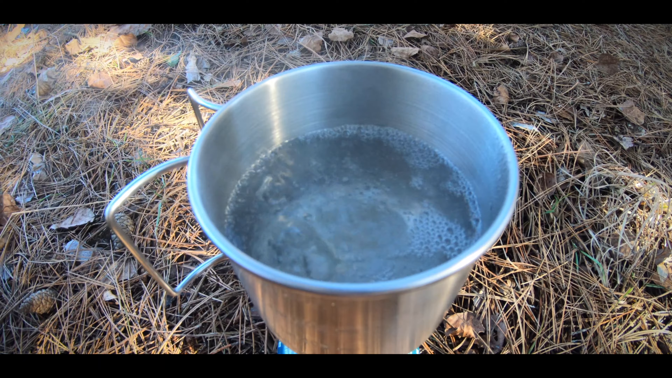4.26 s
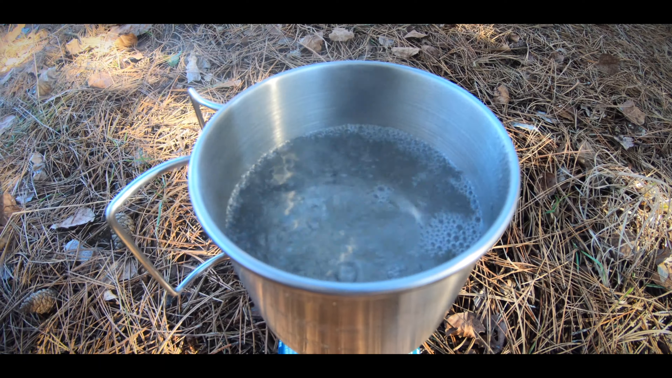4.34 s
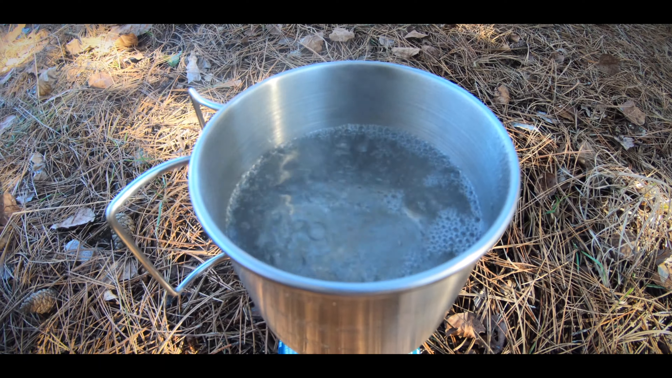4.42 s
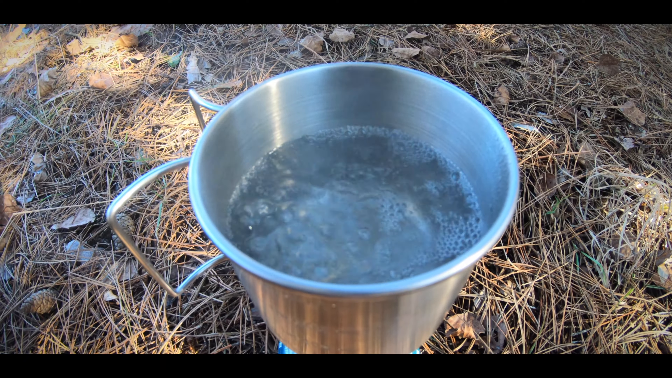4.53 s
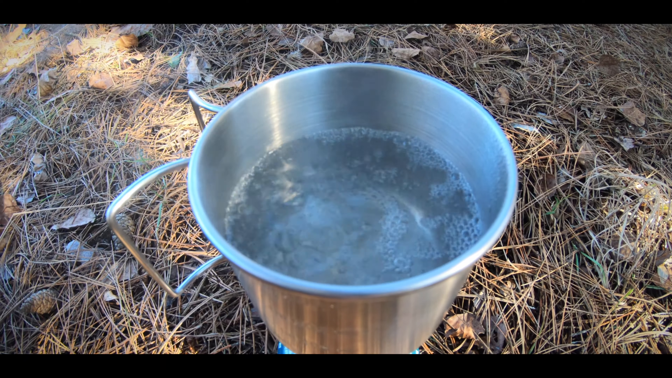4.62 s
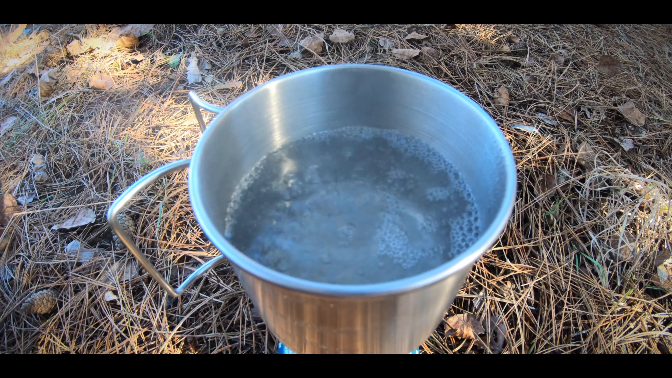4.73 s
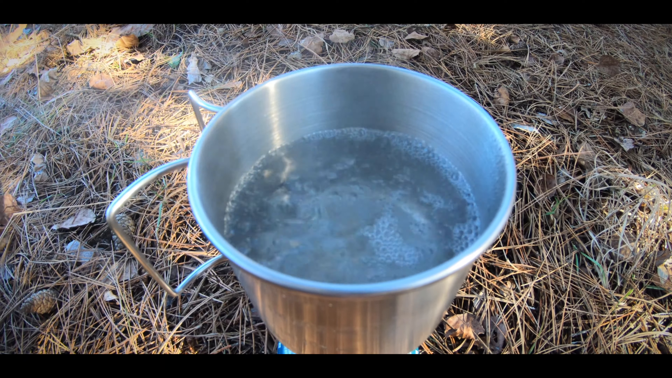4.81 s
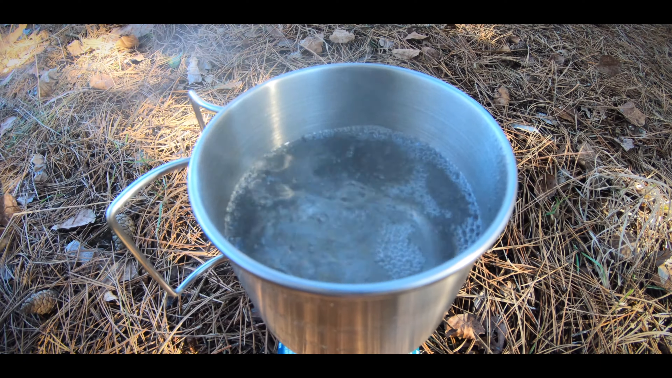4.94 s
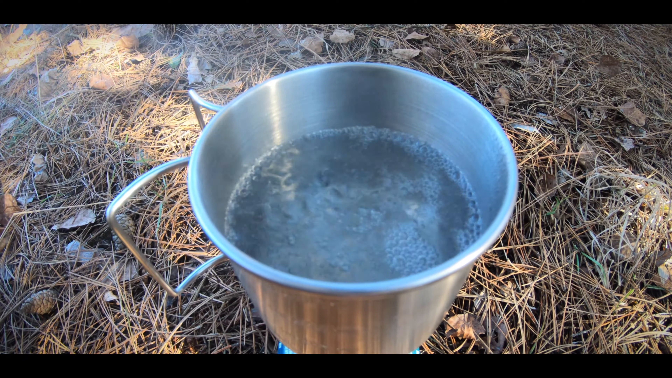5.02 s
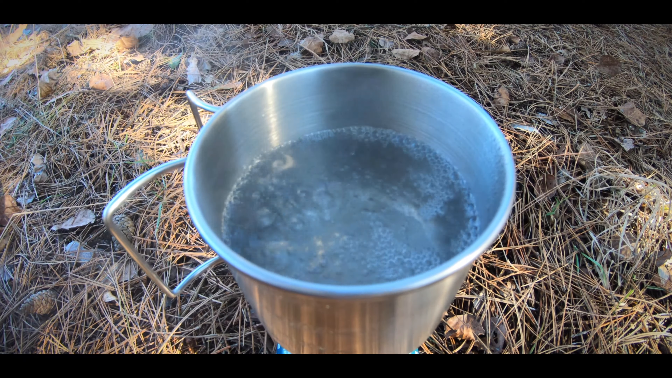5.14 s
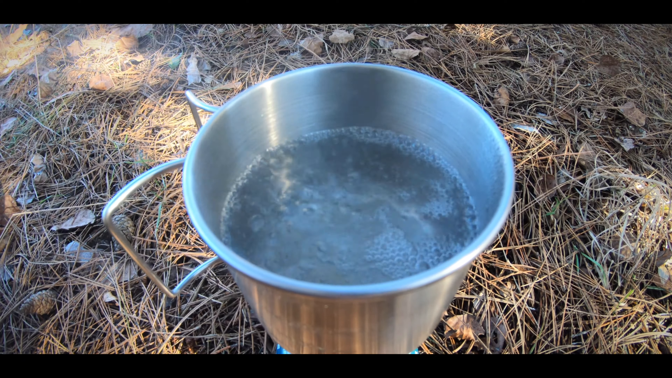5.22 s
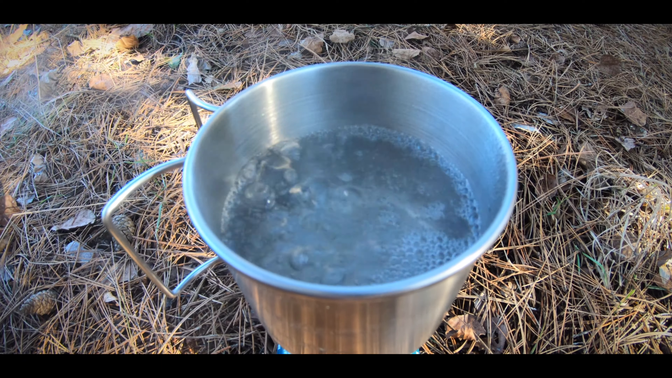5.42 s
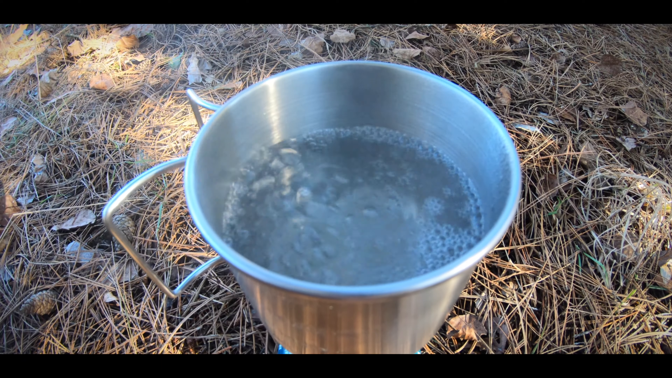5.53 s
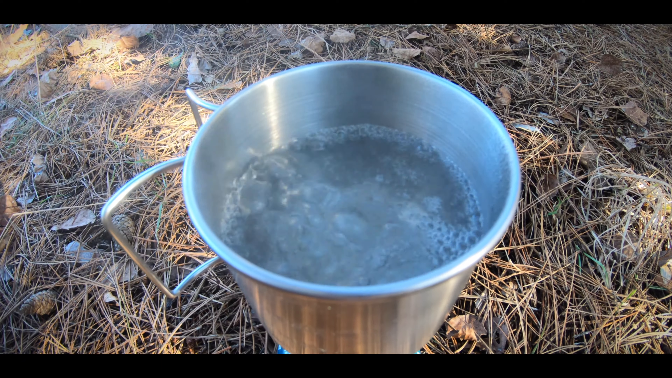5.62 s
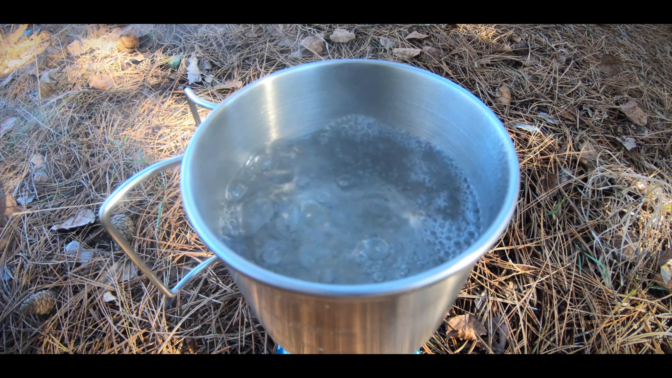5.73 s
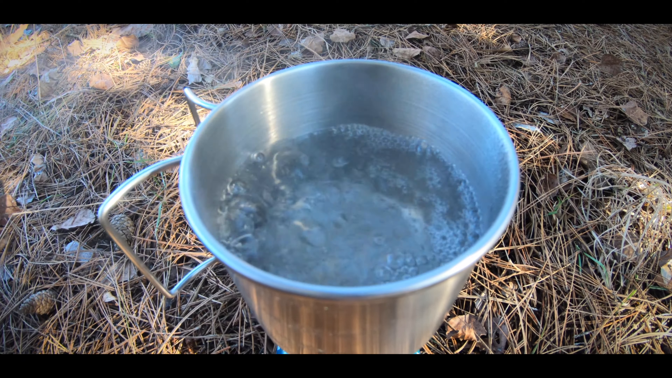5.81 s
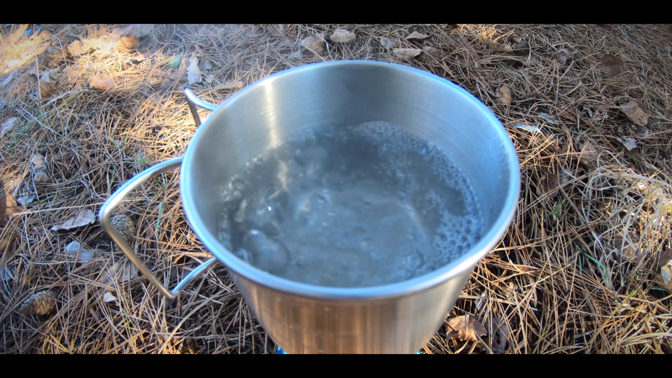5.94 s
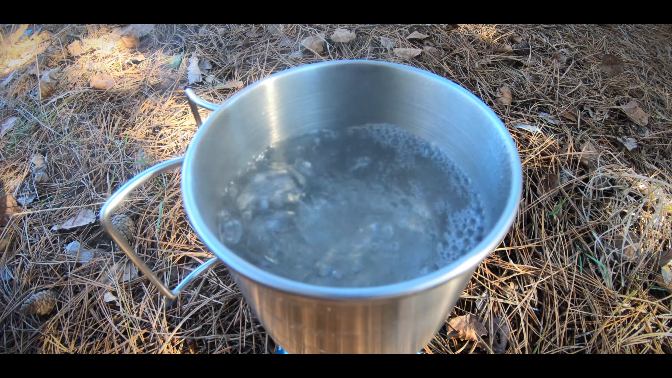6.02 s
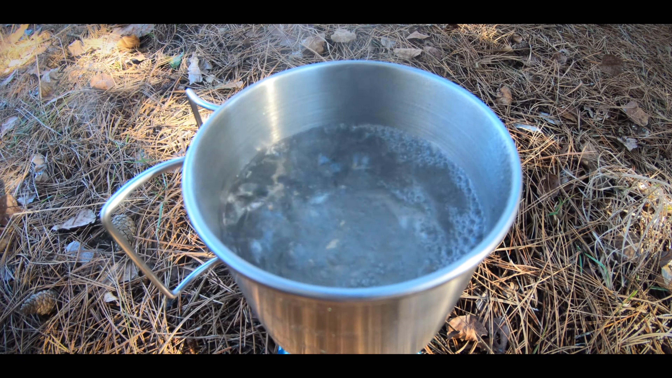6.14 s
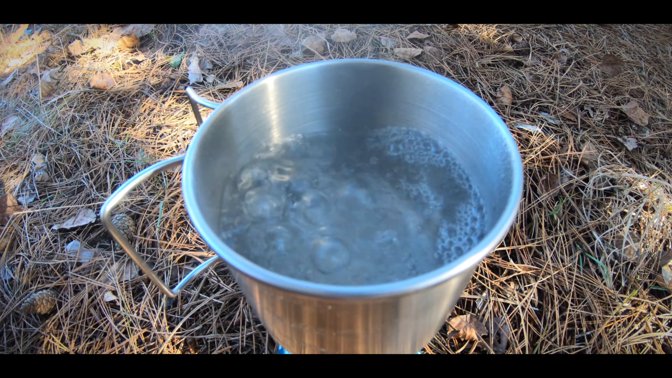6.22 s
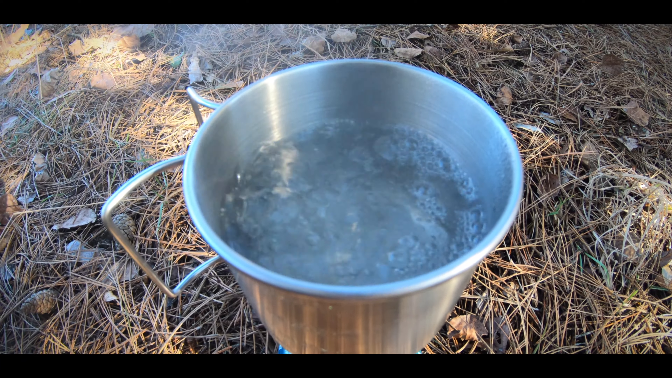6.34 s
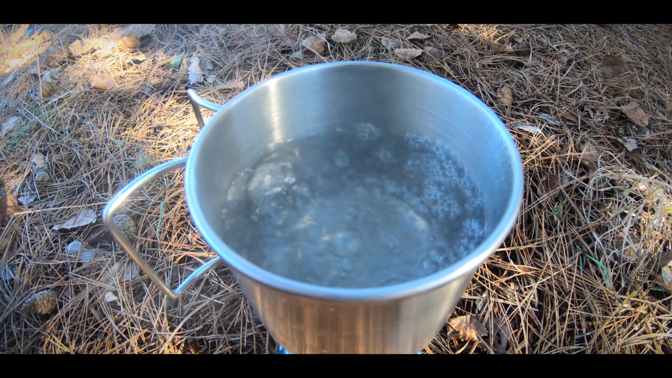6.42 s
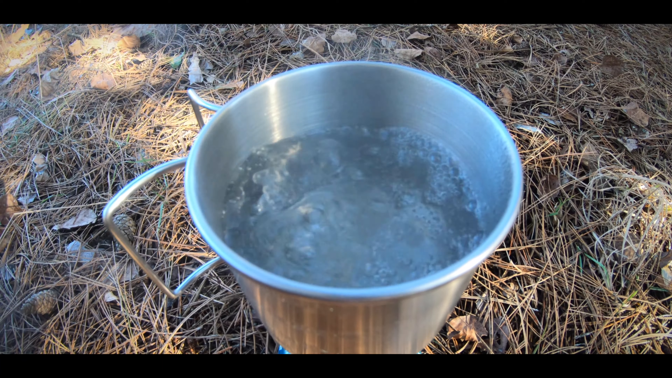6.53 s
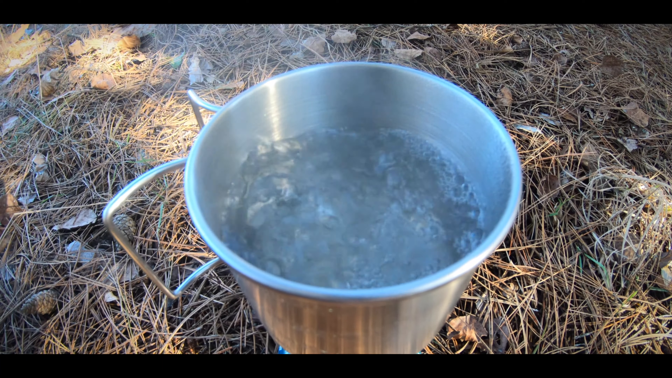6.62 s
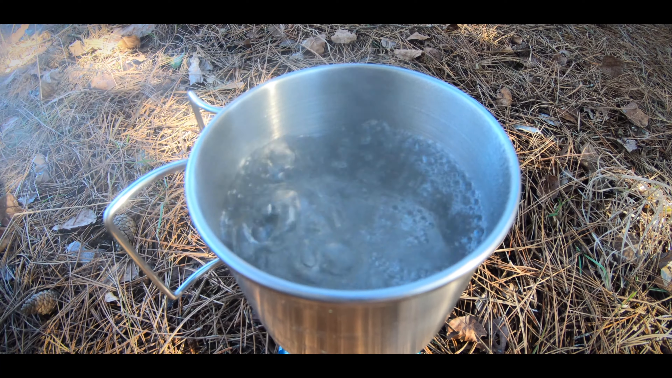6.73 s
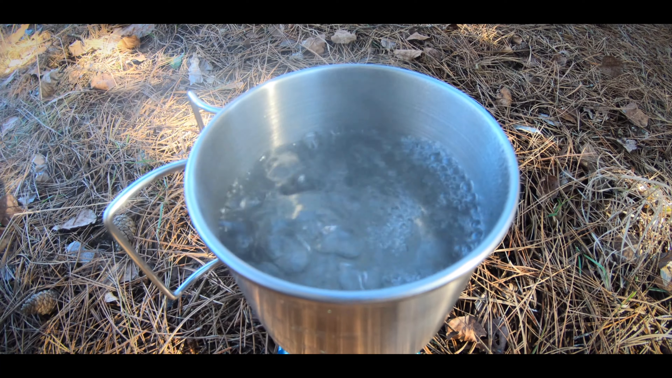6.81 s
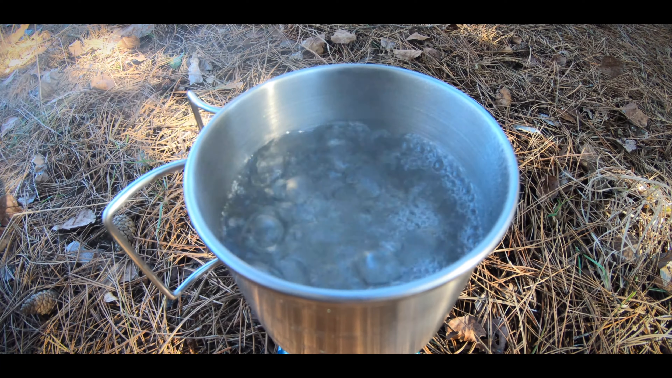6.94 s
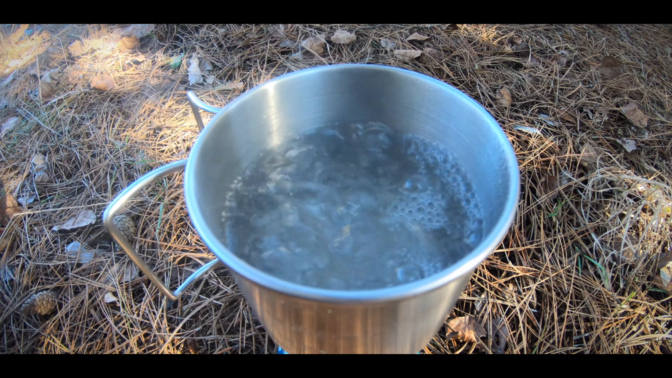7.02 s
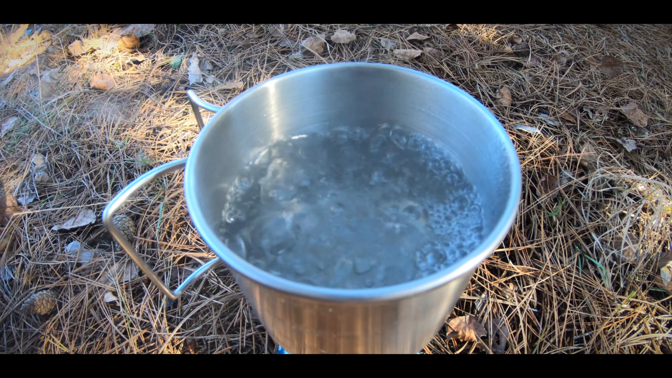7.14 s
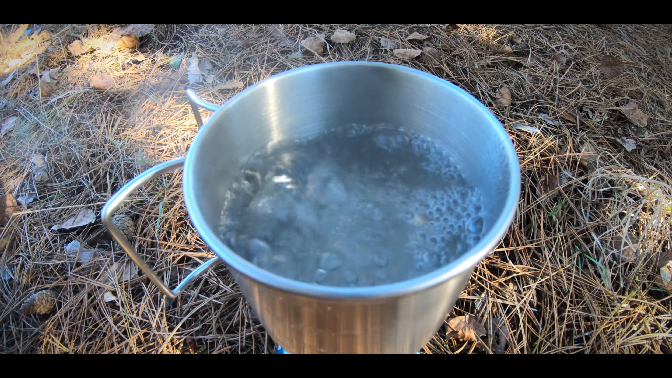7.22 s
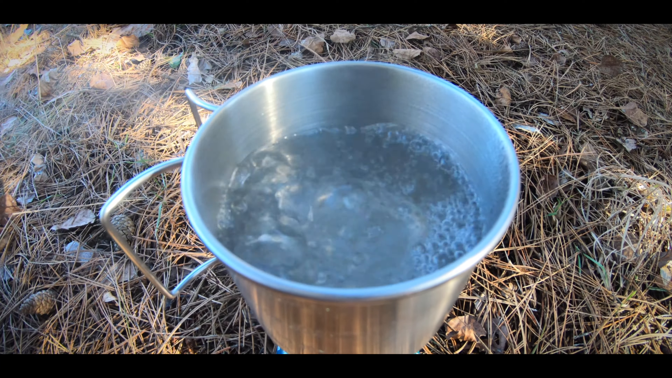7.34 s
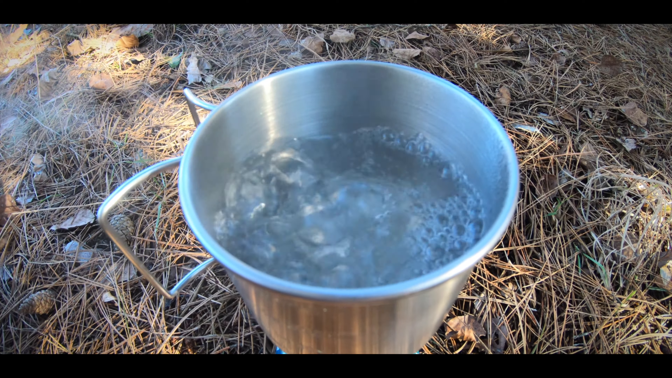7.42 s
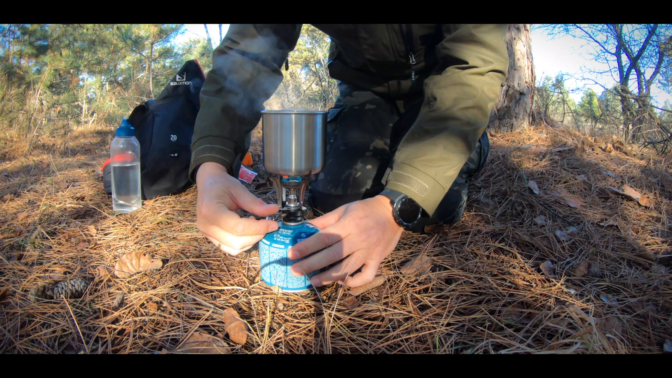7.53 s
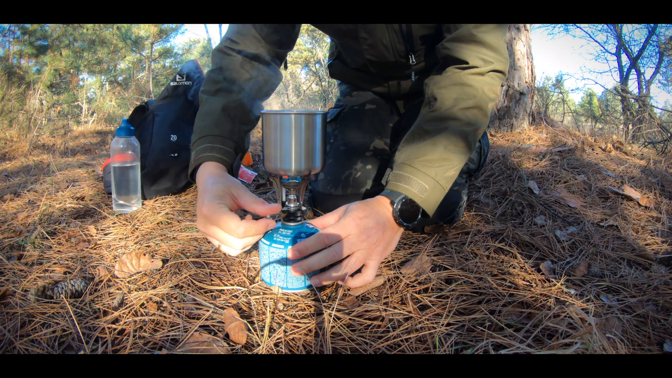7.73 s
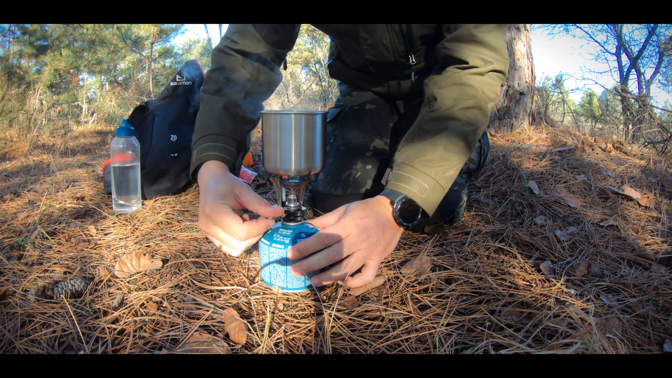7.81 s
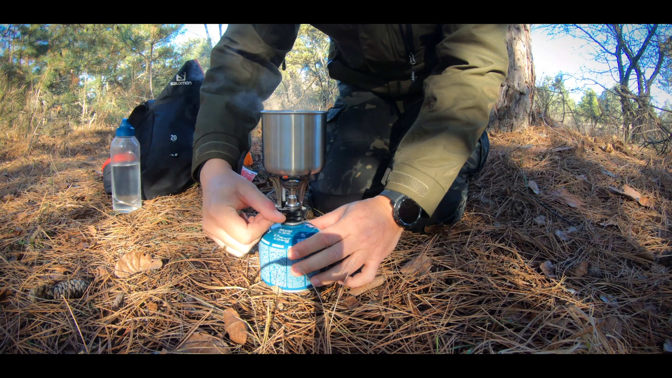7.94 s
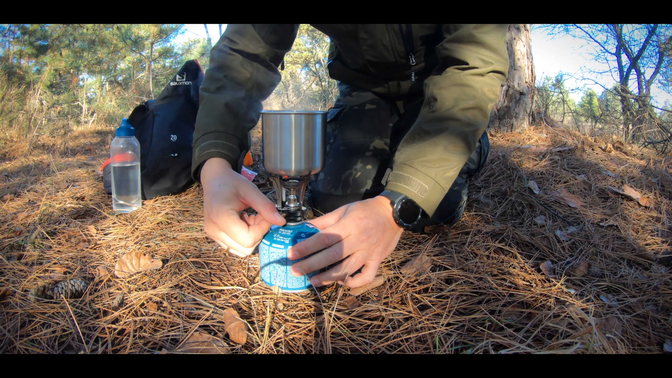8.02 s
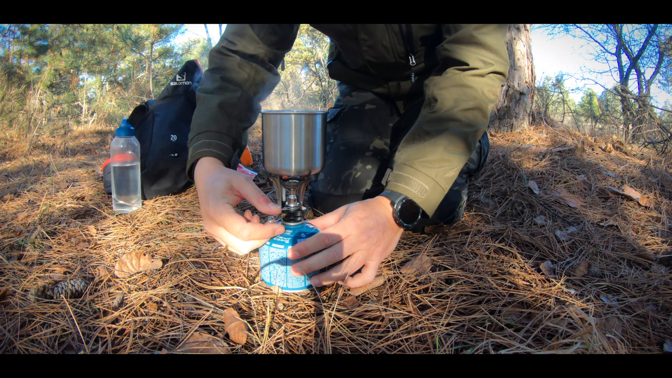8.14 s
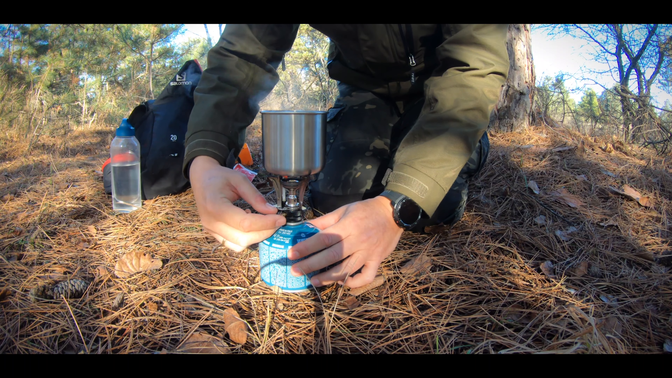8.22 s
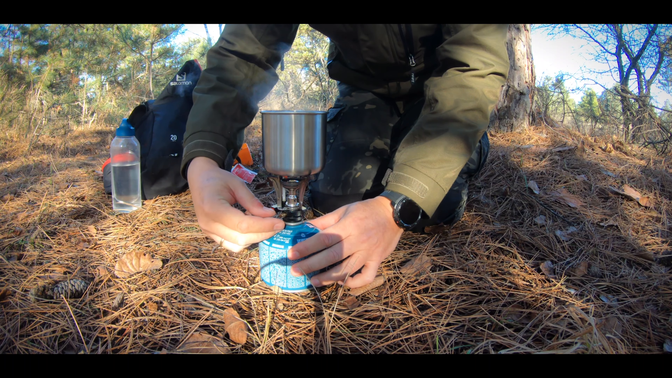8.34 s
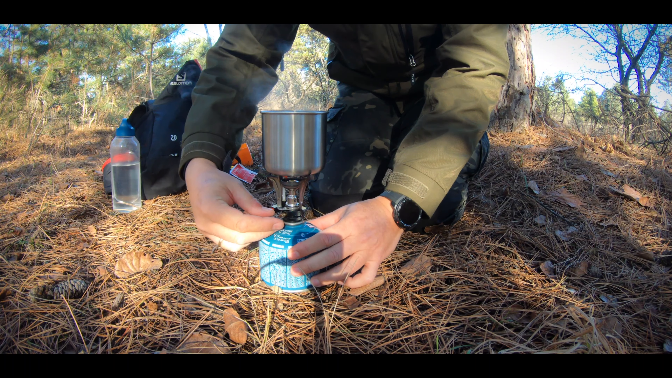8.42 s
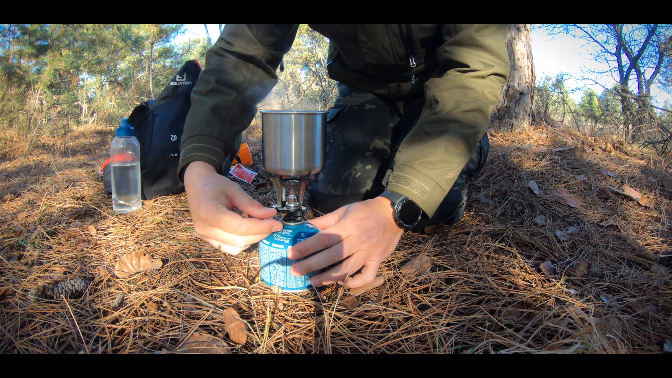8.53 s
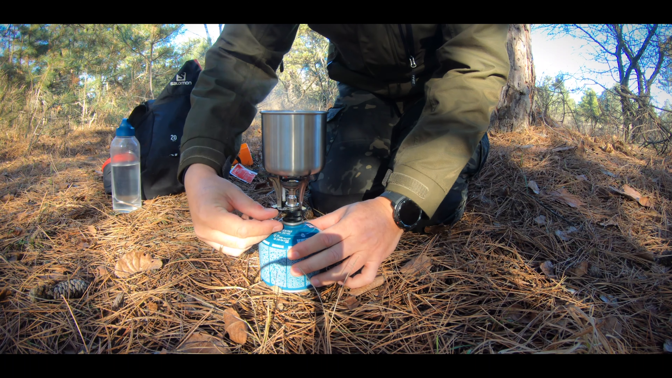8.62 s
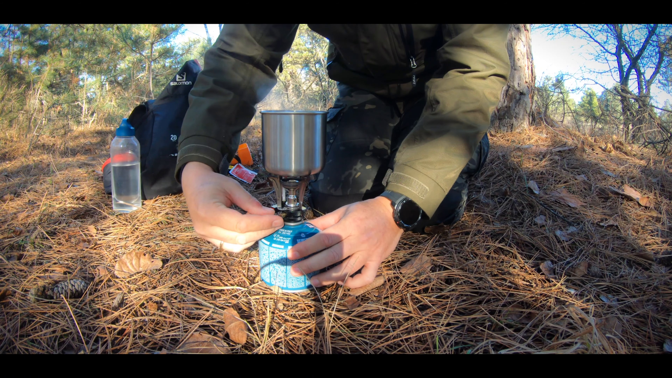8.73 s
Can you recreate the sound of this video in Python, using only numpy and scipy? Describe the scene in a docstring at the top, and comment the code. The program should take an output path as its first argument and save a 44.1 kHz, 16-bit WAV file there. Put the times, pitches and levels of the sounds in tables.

```python
"""A small gas stove roars under a steel mug of boiling water on a forest floor, heard close by in stereo.
From above the mug, noise bands make the turbulent flame rumble and rush and the gas jet hiss.
From the front it is brighter; the valve is screwed shut and rings with a few ticks, each a sum of decaying modes.
Short pings make the bubbles; the last of them, a distant drone and the cooling burner's ticking remain."""
import sys
import numpy as np
from scipy import signal
from scipy.fft import rfft, irfft, next_fast_len
from scipy.io import wavfile

SR = 44100
rng = np.random.default_rng(int(sys.argv[2]) if len(sys.argv) > 2 else 0)


def int16_out(signal):
    """Quantize to a 16-bit WAV file."""
    q = np.round(np.clip(np.atleast_2d(signal).T, -1, 1) * 32767)
    wavfile.write(sys.argv[1], SR, q.astype(np.int16))


N = 386749
T = np.arange(N) / SR  # s
SIZE = next_fast_len(N, True)
HZ = np.fft.rfftfreq(SIZE, 1 / SR)

# Band limit of the recorder, and the time when the microphones change place from above to the front
EDGE_HZ, MOVE_S = 14900, 7.53

# Forest wash around the stove: f/Hz, density/dB
FOREST_SPECTRUM = [(20, -9), (60, 10), (110, -3), (300, -4), (560, -11), (900, -11), (1200, -11),
                   (1550, -9), (2000, -16), (2600, -10.5), (3600, -8.5), (4400, -12), (6300, -17),
                   (8000, -15), (9000, -14.5), (10200, -24), (11200, -39), (15000, -52)]
# Distant droning bands: f/Hz, width/Hz, level/dB
DRONE_BANDS = [(182, 99, -6), (650, 90, -26), (820, 240, -20)]
# Level of the whole drone: t/s, level/dB
DRONE_LEVEL = [(8.1, -63), (8.3, -65), (8.55, -61.5), (8.75, -58.5)]
# Slight breeze at the microphones: f/Hz, density/dB
BREEZE_SPECTRUM = [(10, 4), (35, 4), (70, -1), (200, -40)]

# Microphone pairs, for the forest, above the mug and in front of the stove:
# f/Hz, left over right/dB, likeness (-1 to 1), lead of the left/rad
AROUND_PORTS = [(200, -0.5, 0.73, 0), (700, 0, -.5, 0), (2000, 2, 0, 0), (3400, 1, .85, 0),
                (7000, -1, .25, 0)]
ABOVE_PORTS = [(100, -1.1, .993, 0), (430, -1.4, .997, 0), (800, -3.8, .997, 0), (1200, -4, .995, 0),
               (1600, -5.6, .98, 0), (1900, -5.5, .55, .5), (2400, -2, .91, .3), (4000, -5.8, .98, 0),
               (5100, -6.7, .94, -.1), (5550, -12, .55, .4), (6150, 0, .25, 1.5), (6700, -11, .35, 1.5),
               (7050, -3.6, .78, .4), (7500, -4.2, .66, 1.9), (8200, -3, .3, -2.3), (9000, 0, .15, -1),
               (12500, -5.4, .22, -1.3)]
FRONT_PORTS = [(300, -1, .99, 0), (1500, 3.5, 0.97, 0), (4200, -1, 1, 0), (5100, 2.5, .72, .4),
               (7200, 1, 0.7, .2), (8200, 1, .3, 0), (11000, 0, 0.74, 0)]

# Thin, bright click at the change of place: t/s, level before a further lift/dB
MOVE_CLICK = [(7.5298, -38)]

# The hot burner ticks as it cools: t/s, high snap peak/dB, lower ring peak/dB
COOLING_TICKS = [(8.218, -55, -57), (8.2538, -55, -59), (8.2862, -56, -63), (8.3228, -58, -63),
                 (8.3645, -59, -63), (8.405, -58, -60), (8.4508, -58, -60), (8.4887, -59, -61),
                 (8.5316, -66, -59), (8.569, -60, -55), (8.6234, -65, -58), (8.6603, -63, -55),
                 (8.7321, -60, -58), (8.7605, -60, -52)]
# What the burner rings with: f/Hz, level/dB, t60/s
BURNER_MODES = [(1420, -5, .025), (2455, 0, .036), (3750, -11, .02), (8650, -3, .02), (8950, 2, .02),
                (9200, -4, .016)]

# Fingertips brush over the handle: t at the height/s, length/s, level/dB, centre f/Hz
BRUSHES = [(7.99, .12, -61, 3400), (8.128, 0.054, -68, 7400), (8.175, .03, -68, 7400),
           (8.403, .04, -72, 1700), (8.72, .015, -70, 6900)]
# Tiny slips of the thread while it is tightened: how often, smallest size, range of pitch
SLIPS_PER_S, SLIP_DB, SLIP_HZ = 130, -58, (1400, 3220)
# From SEATED_S the fingers stop tightening and shift lightly on the handle
SEATED_S, FINGERS_PER_S, FINGERS_DB = 8.2, 14, -64

# Ticks of the valve and its wire handle: t/s, peak before panning and dulling/dB, centre f/Hz
VALVE_TICKS = [(7.951, -37, 1900), (7.9552, -39, 3600), (7.9765, -35.5, 700), (7.9935, -42, 2300),
               (8.0028, -37, 1700), (8.0105, -25.5, 2900), (8.02, -43, 1900), (8.0262, -39, 1000),
               (8.028, -36, 2900), (8.0455, -39, 2700), (8.0565, -43, 1600), (8.064, -45, 1500),
               (8.0675, -39, 2000), (8.11, -46, 1450), (8.137, -44, 2340), (8.147, -44, 1600),
               (8.1645, -49, 1000), (8.169, -33.5, 1950), (8.1765, -37, 2700), (8.185, -46, 2400),
               (8.196, -45, 3400), (8.202, -47, 3400), (8.41, -52, 1500)]
# What the valve rings with: f/Hz, level before the drive of a tick/dB, t60/s
VALVE_MODES = [(840, -12, .011), (1510, -5, .016), (1780, -4, .011), (2260, 2, .008), (2880, 3, 0.0077),
               (3340, -2, .009), (3900, 0, .009)]
TICK_LOW_SHARE = 0.49  # a tick has little below this share of its centre pitch
GROUND_ECHO_S, GROUND_ECHO_DB = 0.00128, -14  # the ground below throws each tick back

# The boil in the mug: t/s, bubbles a second, smallest size before dulling/dB
BOIL = [(0, 60, -42), (4.4, 60, -43.5), (4.6, 160, -47), (7.5, 140, -39.5), (7.9, 350, -54),
        (8.1, 400, -65), (8.25, 400, -61), (8.5, 150, -77), (8.75, 50, -72)]
# Single bubbles bursting in the mug: t/s, peak before panning and dulling/dB, f/Hz
POPS = [(0.424, -27, 3020), (0.743, -25, 3110), (2.784, -25, 3130), (5.4291, -29, 3160), (5.878, -29, 2750),
        (6.686, -16, 2950), (7.734, -18.5, 2060), (8.2342, -47, 2770), (8.2452, -44, 3270),
        (8.3345, -46.5, 3420), (8.4457, -46.5, 3520), (8.4916, -50, 3160), (8.525, -50, 3120)]

# Bare flame from the front: f/Hz, density/dB
FRONT_FLAME_SPECTRUM = [(15, -63), (25, -31), (48, -16), (164, -3.5), (470, -19), (505, -20), (594, -15),
                        (770, -12), (920, -18), (1200, -13), (1480, -23.5), (1800, -29.5), (2340, -46),
                        (3960, -120)]
# Bare jet from the front: f/Hz, density/dB
FRONT_JET_SPECTRUM = [(1000, -22), (1700, -4), (2350, -1.5), (2690, -4), (3030, -12), (3310, -6),
                      (3700, -10), (4260, -8.5), (5010, -15), (5850, -12), (6230, -18), (6600, -13),
                      (7260, -11.5), (7940, -19), (9100, -17.5), (10400, -26), (11100, -37), (14700, -42)]
FRONT_JET_DB, FRONT_RUSH_DB, FRONT_RUMBLE_DB = -36.5, -29.5, -29  # with the valve open
# The bare jet flares: t at the height/s, length/s, rise/dB
FLARES = [(7.56, .06, 1), (7.64, .05, 1.2), (7.735, .07, 1.5)]
SHUT_S, TURN_S = 7.927, 0.17  # when the valve is shut, and how long the turn takes
RUSH_OUT_S = 7.908  # the feed of the small tongues ends just before the valve is shut
TONGUE_LAG_S, BURN_OUT_S = 0.0087, 0.033  # time constants: tongues and burning lag behind the valve
# Powers by which the jet follows the opening, the rush the tongues, the rumble the burning
JET_POWER, RUSH_POWER, RUMBLE_POWER = 1, 0.7, 0.88
LEAK_DB, LEAK_FALL_DB_PER_S = -18.5, 56  # the last gas seeps out: against the open jet, and its fading
GUTTER_DB = 1  # extra flutter of the starved flame, reached in full as the valve is nearly shut

# Flame from above: f/Hz, density/dB
FLAME_SPECTRUM = [(15, -37), (30, -37), (55, -11.5), (80, 0), (150, -1.5), (215, -6), (320, -7.5),
                  (440, -11), (720, -6), (830, -7), (930, -8.5), (1080, -7), (1300, -8.5), (1430, -12),
                  (1510, -17), (1620, -19), (1830, -35.5), (3000, -71)]
# Gas jet from above: f/Hz, density/dB
JET_SPECTRUM = [(1400, -40), (1850, -7), (2300, 0), (2650, -2), (3150, 1.5), (3500, -2), (3950, -9),
                (4400, -3), (5450, -3), (5850, -11.5), (6300, -12.5), (6850, -7), (7500, -7.5), (8000, -41),
                (15000, -46)]
# The finest eddies of the jet: f/Hz, density/dB
FIZZ_SPECTRUM = [(7200, -30), (7900, -1), (8700, -3), (9400, -4), (10400, -13), (10950, -32),
                 (11400, -18.9), (13350, -18), (13700, -35), (14700, -39), (16000, -46)]
FIZZ_DB = -17.5  # against the jet
JET_DB, RUSH_DB, RUMBLE_DB = -40.5, -27, -32  # from above, at the average flow
# The gas flow wavers and twice sags: t/s, level against the average/dB
FLOW = [(0.0, 0.5), (0.6, 0.4), (1.15, 0), (1.4, 0.4), (1.55, -2), (1.8, .5), (2.35, 0), (2.55, 0.3),
        (3.3, 1.2), (3.65, -0.4), (3.97, 1.5), (4.2, 0.5), (4.45, 0.5), (4.68, -1.5), (5.1, 0), (5.58, 0.9),
        (6.25, 0), (6.85, 0.6), (7.5, -0.5)]
RUSH_FOLLOWS = 0.82  # dB for each dB of flow
# The rush surges or slackens for a moment: t at the height/s, length/s, rise/dB
SURGES = [(.3, 0.12, 0.8), (.85, .12, -1), (2.75, 0.28, 1), (3.48, .12, -0.5), (3.8, .12, 0.5),
          (4.1, 0.16, -2), (5.2, .1, 0.3), (6.29, .12, -1.5), (6.75, .12, 1.8)]
# The body of the hiss swells and dulls: t/s, swell against the average before scaling/dB
HISS_SWELL = [(0, 0.5), (0.55, 0), (1.1, 0.7), (1.28, -1), (1.51, -3.7), (1.68, -0.5), (2.25, 1.5),
              (2.42, 0.3), (3.2, 0.6), (3.48, -1.4), (3.65, -0.2), (3.97, .8), (4.4, 0), (4.7, -1.5),
              (5, 0), (5.55, 1.4), (6.22, -1.5), (6.6, 0.6), (7.05, 0.8), (7.4, -1.2)]
HISS_TOP_HZ = 5900  # above this the hiss stays nearly steady
# Below and above the split: dB for each dB of swell
HISS_SPLIT_HZ, LOW_HISS_FOLLOWS, HIGH_HISS_FOLLOWS = 3700, .8, 1.25
# The flame billows under the mug, or lulls: t at the height/s, length/s, rise before scaling/dB
BILLOWS = [(0.2, .2, 2.5), (0.47, 0.34, 3), (0.68, 0.24, 5), (.89, .1, -6), (1.03, 0.22, 3),
           (1.57, 0.22, 6.5), (1.8, .2, -1), (2.19, 0.2, 2), (2.5, 0.18, 3.5), (2.967, 0.13, 4),
           (3.194, 0.12, -5), (3.296, 0.14, 3.5), (4.15, 0.28, 3.5), (4.385, 0.34, 5.5), (4.79, .14, 4),
           (5.25, .14, 2.5), (5.618, 0.13, 3), (6.14, .16, -1.5), (6.345, .2, 8), (6.44, .08, -6),
           (6.8, 0.32, 4.5), (6.985, 0.14, 6), (7.14, .1, -2)]
SWAY_DB = 0.5  # random sway of the flame, added to the billows before scaling
RUMBLE_FOLLOWS = 0.73  # dB for each dB of billow and sway
# The flame booms under the mug: pitch, width, level, dB for each dB of billow
HOLLOW_HZ, HOLLOW_WIDTH_HZ, HOLLOW_DB, HOLLOW_FOLLOWS = 133.7, 80, -37.5, 1.35
# The flame spits under the mug: t/s, peak before panning and dulling/dB, f/Hz
SPITS = [(0.293, -21, 550), (0.946, -18, 740), (1.857, -15, 970), (2.507, -17, 1090), (2.768, -18, 805),
         (3.302, -17, 750), (5.476, -17, 820), (5.826, -16.5, 660), (6.031, -18, 776), (7.086, -13.5, 1090),
         (7.475, -15, 830)]


def gain_of(db):
    """Decibels to amplitude."""
    return 10 ** (np.asarray(db) / 20)


def evened(x):
    """Scales a sound so that its middle has rms 1."""
    middle = np.atleast_2d(x).mean(0)
    return x / np.sqrt(np.mean(middle ** 2) + 1e-20)


def over_hz(rows):
    """Each column of a table, joined on a log-frequency axis."""
    f, *columns = np.transpose(rows)
    return [np.interp(np.log(HZ + 1), np.log(f + 1), c) for c in columns]


def over_time(rows):
    """Each column of a table, joined in time."""
    s, *columns = np.transpose(rows)
    return [np.interp(T, s, c) for c in columns]


def colour(rows):
    """A spectrum table as gain per frequency."""
    return gain_of(over_hz(rows)[0])


def add(mix, s, sound):
    """Lays a sound into the mix at a time."""
    part = mix[max(round(s * SR), 0):][:len(sound)]
    part += sound[:len(part)]


def bumps(rows):
    """A smooth rise or dip in dB for each row."""
    return sum(db * np.cos(np.pi * np.clip((T - s) / length, -.5, .5)) ** 2 for s, length, db in rows)


def lagging(x, lag_s):
    """Follows a control with a time constant."""
    keep = np.exp(-1 / (lag_s * SR))
    return signal.lfilter([1 - keep], [1, -keep], x)


def dulled(x, edge_hz):
    """Takes off the treble above an edge."""
    return signal.sosfilt(signal.butter(5, edge_hz, fs=SR, output="sos"), x)


def below(x, edge_hz):
    """The part of a sound under an edge, with no delay."""
    return irfft(rfft(x, SIZE) / (1 + (HZ / edge_hz) ** 20), SIZE)[:, :N]


def eddies(low_hz, high_hz):
    """Random unsteadiness of rms 1 between two rates."""
    band = HZ / np.hypot(HZ, low_hz) / (1 + (HZ / high_hz) ** 2)
    return evened(irfft(rfft(rng.standard_normal(SIZE)) * band, SIZE)[:N])


def noise(gain, ports):
    """Coloured noise of rms 1 as two neighbouring microphone ports pick it up."""
    pan_db, same, lead = over_hz(ports)
    same = np.clip(same, -.9, .998)
    tilt = gain_of(pan_db / 2)
    a, b = rfft(rng.standard_normal((2, SIZE)))
    left = a * tilt * np.exp(1j * lead)
    right = (same * a + np.sqrt(1 - same ** 2) * b) / tilt
    # how the two ports add up
    middle = np.sqrt(tilt ** 2 + tilt ** -2 + 2 * same * np.cos(lead))
    return evened(irfft(np.array([left, right]) * gain / middle, SIZE)[:, :N])


def ping(hz, cycles):
    """A few cycles that swell within the first one and die away quickly; peak 1."""
    turns = hz * np.arange(SR // 40) / SR
    wave = np.sin(2 * np.pi * turns) * np.exp(-turns / cycles) * (1 - np.exp(-(2 * turns) ** 2))
    return wave / abs(wave).max()


def scattered_pings(impulses, pitches, cycles):
    """Turns each impulse into a ping of a pitch drawn at random from a few."""
    kind = rng.integers(0, len(pitches), N)
    out = np.zeros(N)
    for k, hz in enumerate(pitches):
        out += signal.oaconvolve(impulses * (kind == k), ping(hz, cycles))[:N]
    return out


def struck(modes, weights):
    """Metal rings after a tap, each mode driven by its weight; peak 1."""
    t = np.arange(SR // 12) / SR
    wave = np.zeros(len(t))
    for weight, (hz, db, t60) in zip(weights, modes):
        wave += weight * gain_of(db - 60 * t / t60) * np.sin(2 * np.pi * hz * t)
    return wave / abs(wave).max()


def forest():
    """A soft outdoor wash with distant droning bands, and a slight breeze, weaker from the front."""
    wash = noise(colour(FOREST_SPECTRUM), AROUND_PORTS) * gain_of(-65.5 + 1.2 * eddies(low_hz=3, high_hz=25))
    bands = sum(gain_of(db) / (1 + (2 * (HZ - hz) / width) ** 2) for hz, width, db in DRONE_BANDS)
    drone = noise(bands, AROUND_PORTS) * gain_of(over_time(DRONE_LEVEL)[0])
    unlike_ports = [(50, 0, 0, 0)]  # the breeze is independent on each port
    breeze = noise(colour(BREEZE_SPECTRUM), unlike_ports) * gain_of(np.where(T < MOVE_S, -56, -73))
    return wash + drone + breeze


def click(pitch_hz=12500, extra_db=6):
    """A thin, bright click as the listening place changes."""
    out = np.zeros(N)
    for s, db in MOVE_CLICK:
        add(out, s, gain_of(db + extra_db) * ping(pitch_hz, cycles=1.5))
    return out


def ticking(split_hz=6000):
    """The burner shrinks in small jerks: a dry high snap with a lower ring, which outweighs it in later ticks."""
    out = np.zeros(N)
    high = np.transpose(BURNER_MODES)[0] > split_hz
    chances = rng.standard_normal((len(COOLING_TICKS), len(BURNER_MODES)))
    for (s, snap_db, ring_db), chance in zip(COOLING_TICKS, chances):
        weights = gain_of(2.5 * chance)
        snap = gain_of(snap_db) * struck(BURNER_MODES, weights * high)
        ring = gain_of(ring_db) * struck(BURNER_MODES, weights * ~high)
        add(out, s, snap + ring)
    return dulled(out, edge_hz=10000) * gain_of([[.7], [-.7]])


def brushing(width_octaves=0.31, grain_db=4):
    """Fingertips slide over the handle in short, grainy strokes of band noise."""
    out = np.zeros((2, N))
    grain = gain_of(grain_db * eddies(low_hz=40, high_hz=300))
    for s, length, db, hz in BRUSHES:
        band = np.exp(-(np.log2((HZ + 1) / hz) / width_octaves) ** 2 / 2)
        stroke = np.cos(np.pi * np.clip((T - s) / length, -.5, .5))
        out += gain_of(db) * stroke * evened(noise(band, FRONT_PORTS) * grain)
    return out


def rubbing(spread_db=3):
    """The thread grates in tiny uneven slips as the valve seats; afterwards the fingers barely stir."""
    rate = np.where(T < SEATED_S, SLIPS_PER_S, FINGERS_PER_S) * (T > SHUT_S)
    size_db = np.where(T < SEATED_S, SLIP_DB, FINGERS_DB)
    size_db = size_db + spread_db * np.minimum(rng.exponential(1, N), 2)
    slips = (rng.random(N) < rate / SR) * gain_of(size_db)
    out = scattered_pings(slips, np.geomspace(*SLIP_HZ, num=5), cycles=3.4)
    return out * gain_of([[1.5], [-1.5]])


def valve(spread_octaves=0.72):
    """Each tick rings the valve; a hard catch drives its high modes, a soft knock the low ones."""
    out = np.zeros(N)
    mode_hz = np.transpose(VALVE_MODES)[0]
    for s, db, hz in VALVE_TICKS:
        drive = np.exp(-(np.log2(mode_hz / hz) / spread_octaves) ** 2 / 2)
        thinning = signal.butter(2, TICK_LOW_SHARE * hz, "highpass", fs=SR, output="sos")
        tick = signal.sosfilt(thinning, struck(VALVE_MODES, drive))
        tick = tick / abs(tick).max()
        add(out, s + 0.00086, gain_of(db) * tick)
        add(out, s + .00085 + GROUND_ECHO_S, gain_of(db + GROUND_ECHO_DB) * tick)
    return below(out * gain_of([[1.4], [-1.4]]), edge_hz=4200)


def water():
    """Bubbles of many sizes burst as short pings in the mug, weaker and at last sparser once the flame is gone."""
    rate, size_db = over_time(BOIL)
    size_db = size_db + 3.8 * np.minimum(rng.exponential(1, N), 3)
    bursts = (rng.random(N) < rate / SR) * gain_of(size_db)
    out = scattered_pings(bursts, np.geomspace(2500, 3900, num=12), cycles=2.1)
    for s, db, hz in POPS:
        add(out, s + 0.00076, gain_of(db) * ping(hz, cycles=2.1))
    return dulled(out, edge_hz=4000) * gain_of([[-.5], [.5]])


def spits():
    """Now and then a pocket of gas catches with a short, dull pop."""
    out = np.zeros(N)
    for s, db, hz in SPITS:
        add(out, s, gain_of(db) * ping(hz, cycles=1.8))
    return dulled(out, edge_hz=1400) * gain_of([[-2], [2]])


def billowing():
    """Billows in dB: a smooth bump for each, over a random sway."""
    return bumps(BILLOWS) + SWAY_DB * eddies(low_hz=1.5, high_hz=7.9)


def booming():
    """Each billow drives a low, hollow resonance under the mug."""
    band = 1 / (1 + (2 * (HZ - HOLLOW_HZ) / HOLLOW_WIDTH_HZ) ** 4)
    return noise(band, ABOVE_PORTS) * gain_of(HOLLOW_DB + HOLLOW_FOLLOWS * bumps(BILLOWS))


def closing():
    """In dB: the opening of the evenly screwed valve, the tongues it feeds, and the burning that lags behind."""
    opening = np.clip((SHUT_S - T) / TURN_S, 1e-4, 1)
    tongues = np.clip((RUSH_OUT_S - T) / TURN_S, 1e-4, 1)
    return 20 * np.log10([opening, lagging(tongues, TONGUE_LAG_S), lagging(opening, BURN_OUT_S)])


def flame(spectrum, ports, rush_db, rumble_db, split_hz, flutter_db):
    """The flame as a whole rumbles; its small tongues rush above that in quick, uneven bursts."""
    low = 1 / (1 + (HZ / split_hz) ** 6)
    rumble = noise(colour(spectrum) * np.sqrt(low), ports)
    rush = noise(colour(spectrum) * np.sqrt(1 - low), ports)
    flutter = gain_of(flutter_db * eddies(low_hz=9.9, high_hz=198))
    return gain_of(rumble_db) * rumble + gain_of(rush_db) * evened(rush * flutter)


def from_front():
    """The bare burner is brighter and sputters; jet and flame die as the valve closes, and a last leak fades."""
    open_db, tongues_db, burning_db = closing()
    rush_db = FRONT_RUSH_DB + RUSH_POWER * tongues_db
    rumble_db = FRONT_RUMBLE_DB + RUMBLE_POWER * burning_db
    fire = flame(FRONT_FLAME_SPECTRUM, FRONT_PORTS, rush_db, rumble_db, split_hz=330, flutter_db=2.0)
    starved = 1 - gain_of(open_db)
    fire = fire * gain_of(GUTTER_DB * starved * eddies(low_hz=25, high_hz=90))
    leak_db = LEAK_DB - LEAK_FALL_DB_PER_S * np.maximum(T - SHUT_S, 0)
    jet_db = FRONT_JET_DB + bumps(FLARES) + np.maximum(JET_POWER * open_db, leak_db)
    sputter = gain_of(1.0 * eddies(low_hz=12, high_hz=160))
    jet = evened(noise(colour(FRONT_JET_SPECTRUM), FRONT_PORTS) * sputter)
    return fire + jet * gain_of(jet_db)


def hiss_from_above(tremble):
    """The jet's turbulence hisses; its body swells and trembles while its top stays nearly steady."""
    swell_db, = over_time(HISS_SWELL)
    fizz = gain_of(FIZZ_DB) * noise(colour(FIZZ_SPECTRUM), ABOVE_PORTS)
    jet = noise(colour(JET_SPECTRUM), ABOVE_PORTS) + fizz
    low = below(jet, HISS_SPLIT_HZ)
    body = below(jet, HISS_TOP_HZ)
    swelling = low * gain_of(LOW_HISS_FOLLOWS * swell_db)
    swelling = swelling + (body - low) * gain_of(HIGH_HISS_FOLLOWS * swell_db)
    top = (jet - body) * gain_of(.55 * eddies(low_hz=0.83, high_hz=25) + .3 * tremble)
    return (swelling * gain_of(0.75 * tremble) + top) * gain_of(JET_DB)


def from_above():
    """The mug screens the jet, so the flame leads; its rush and the hiss share a tremble."""
    flow_db, = over_time(FLOW)
    tremble = eddies(low_hz=2.5, high_hz=45)
    rush_db = RUSH_DB + RUSH_FOLLOWS * flow_db + bumps(SURGES) + 0.45 * tremble
    rumble_db = RUMBLE_DB + RUMBLE_FOLLOWS * billowing()
    fire = flame(FLAME_SPECTRUM, ABOVE_PORTS, rush_db, rumble_db, split_hz=239, flutter_db=1.2)
    return fire + booming() + spits() + hiss_from_above(tremble)


def scene():
    """The stove from one place and then abruptly from the other, in the quiet of the forest."""
    background = forest() + click()
    handling = ticking() + brushing() + rubbing() + valve()
    stove = np.where(T < MOVE_S, from_above(), from_front())
    return background + handling + water() + stove


def record(dry):
    """The recorder's band limit, a steep low-pass with no delay."""
    taps = signal.firwin(511, EDGE_HZ, window=("kaiser", 9), fs=SR)
    return signal.oaconvolve(dry, taps[None], "same", axes=1)


dry = scene()
out = record(dry)
int16_out(out)
```